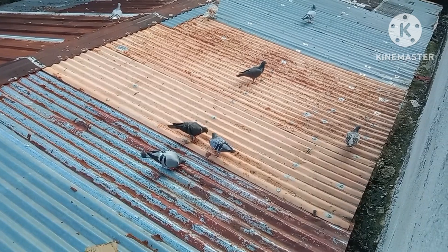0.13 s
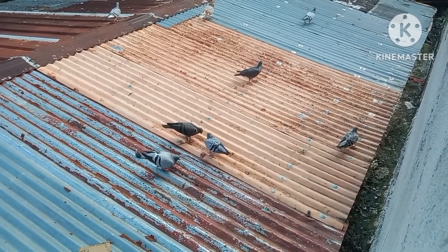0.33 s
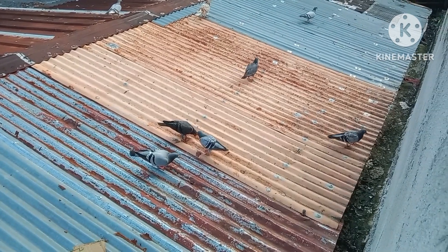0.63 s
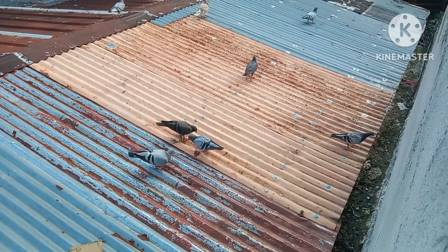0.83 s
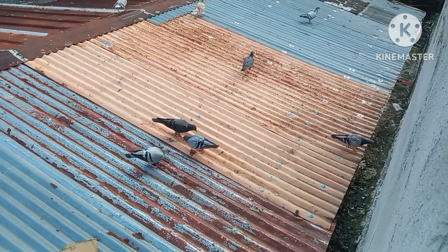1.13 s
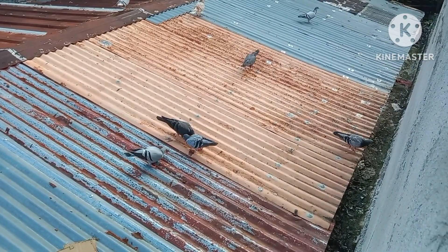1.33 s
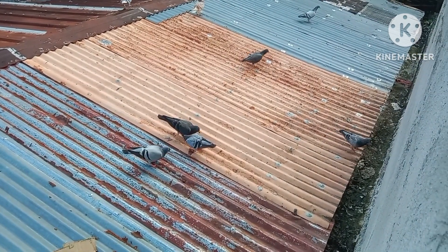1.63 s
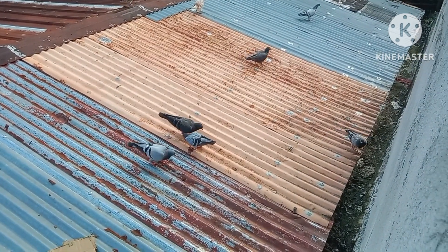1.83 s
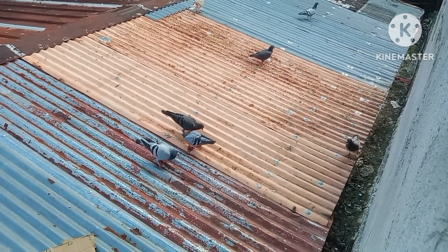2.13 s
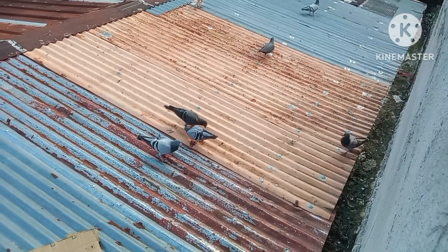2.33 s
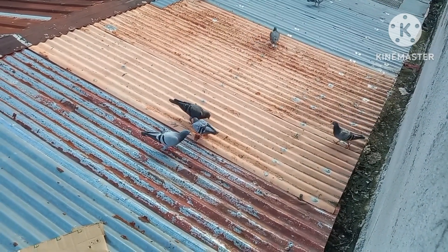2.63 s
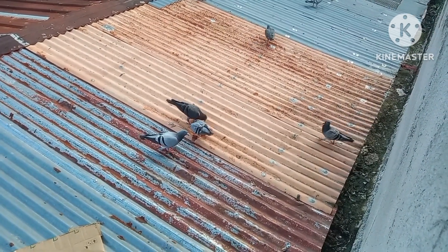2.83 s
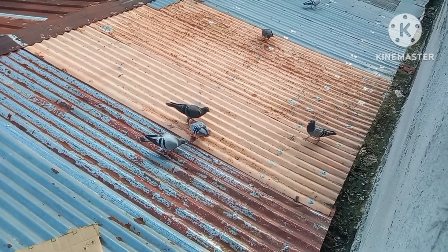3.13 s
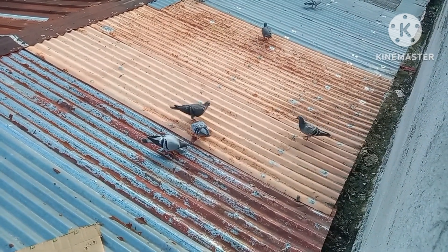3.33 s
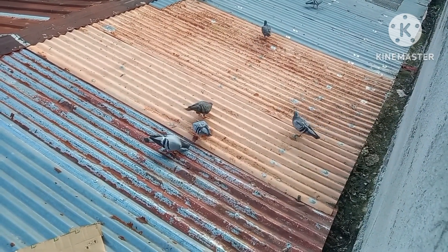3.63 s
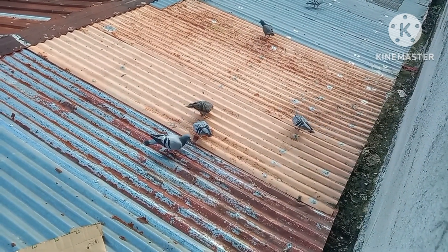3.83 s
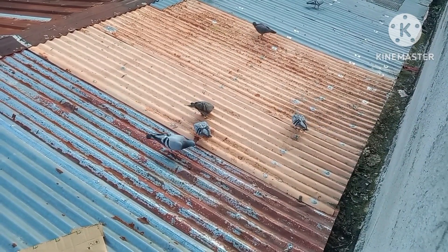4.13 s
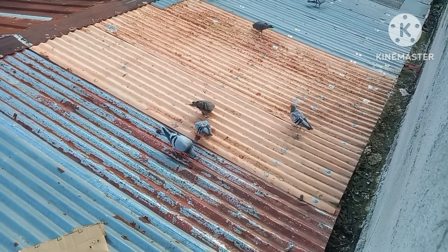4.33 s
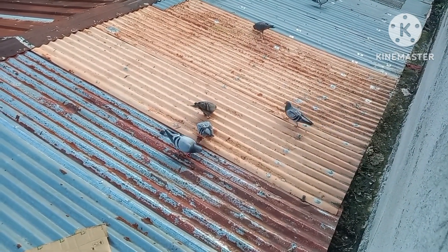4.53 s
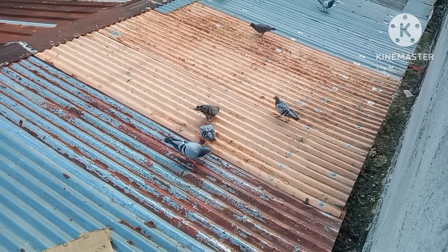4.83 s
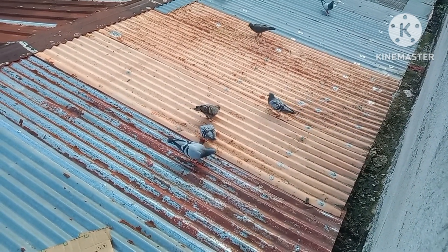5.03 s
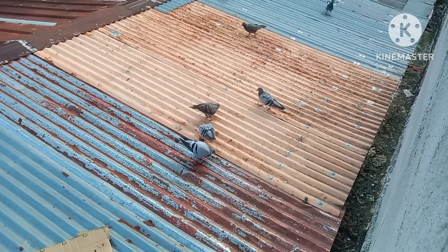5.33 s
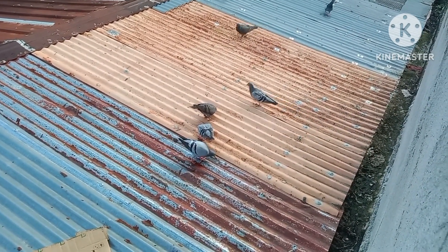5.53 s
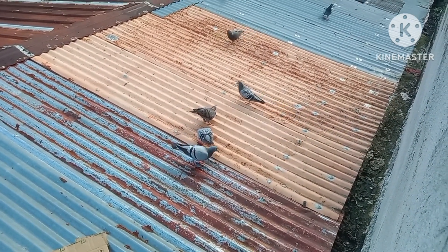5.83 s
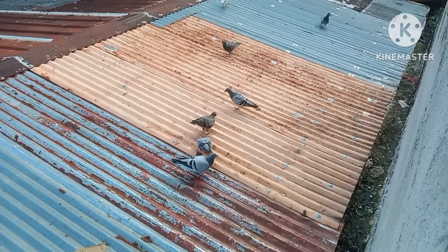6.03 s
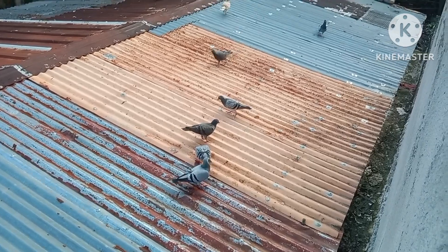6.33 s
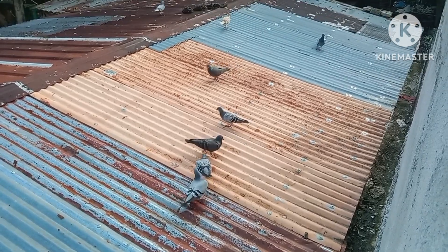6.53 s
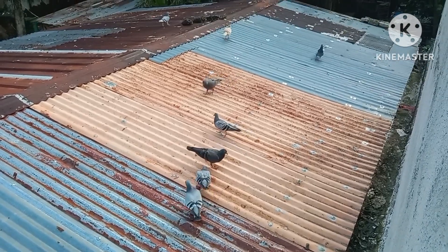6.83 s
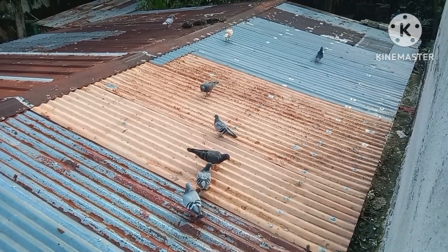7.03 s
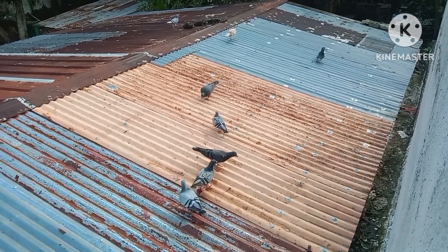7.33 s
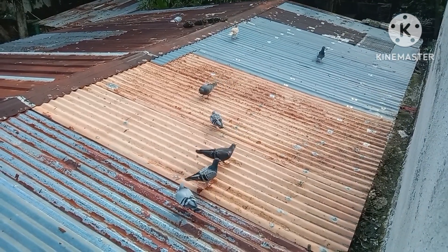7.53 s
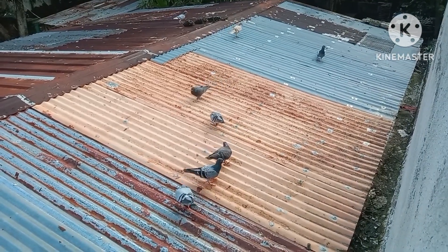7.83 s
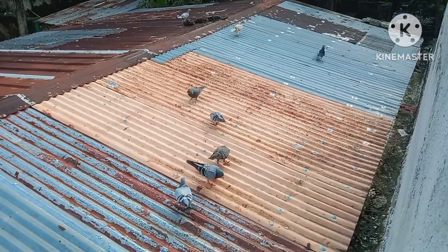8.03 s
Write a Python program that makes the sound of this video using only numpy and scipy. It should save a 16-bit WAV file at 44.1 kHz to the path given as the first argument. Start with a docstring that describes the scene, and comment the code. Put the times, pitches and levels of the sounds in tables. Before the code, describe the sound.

Pigeons on a loose corrugated iron roof outdoors, over faint low rumble and a shimmering high hiss. Thin, trilling, mostly falling squeaks from distant birds echo between walls throughout. At 0.3 s a loud, sharp, dry knock with a push of air lands right at the microphone. A faint coo follows at 1.1 s, another with a light roof touch at 1.9 s. Claws scratch at 2.1 and 2.3 s, with a small peck-like tick at 2.3 s and a rattling metal thump at 2.5 s; a weaker thump comes at 3.1 s. From 3.3 to 5.2 s there are soft, short, hoarse coos and light gritty scrapes. From 5.7 to 6.9 s harder blows clatter, clang and boom on the sheets. Wing claps build from 6.7 s, snapping about seven times a second, strongest around 7.4-7.5 s, with faint whistling swishes and feather rustle, weakening by 8 s.

```python
"""Pigeons on a corrugated iron roof, among thin squeaks that are whistled tones echoing between walls.
First a sharp knock, a pulse and a push of air, sounds right beside the microphone. Soft coos, arching sine tones,
follow; then feet and wings thump the loose sheets, claws scratch and a small tick falls, all from shaped noise
and ringing modes. Late on, harder blows lead into a take-off: noise-burst wing claps, each with a whistling stroke.
Short hollow sounds come now and then, and a faint rumble and a shimmering hiss lie under everything."""
import sys
import numpy as np
from scipy import signal
from scipy.fft import rfft, irfft, next_fast_len
from scipy.io import wavfile
from scipy.ndimage import uniform_filter1d, map_coordinates

SR = 44100
rng = np.random.default_rng(int(sys.argv[2]) if len(sys.argv) > 2 else 0)


def file_out(sig):
    """Save sig as 16-bit WAV at sys.argv[1]."""
    # one column per channel
    cols = np.atleast_2d(sig).T
    # limit, then scale
    lim = np.clip(cols, -1, 1)
    pcm = np.round(lim * 32767).astype(np.int16)
    wavfile.write(sys.argv[1], SR, pcm)


N = 360341
TIME = np.arange(N) / SR  # s

# Feet and wings striking the roof; clang and boom are mixed 1.5 dB lower:
# [t/s, rattle level/dB, clang level/dB, boom level/dB]
ROOF_BLOWS = [(1.9186, -48.5, -44.5, -49.5), (2.484, -32.5, -32, -29), (3.1107, -41, -46.5, -44),
              (3.137, -63, -48, -47.5), (5.709, -29, -31, -40.5), (5.845, -32, -30.5, -33),
              (5.939, -22, -24, -29.5), (5.9882, -35.5, -28, -31.5), (6.137, -48, -35.5, -36),
              (6.302, -44, -32, -44), (6.358, -22, -26, -31), (6.4024, -26.5, -27.5, -27.5),
              (6.553, -27, -29, -29), (6.672, -25.5, -29, -24.5), (6.7618, -31, -39.5, -38),
              (6.832, -34.5, -40.5, -41), (6.9149, -41, -45, -42)]
# Colour of the sheets' rattle: [f/Hz, relative level/dB per Hz]
RATTLE_SPECTRUM = [(1400, -65), (2650, -17.5), (3250, -2.5), (3980, -6.5), (5000, 2), (6150, -0.5),
                   (8000, -20.5), (10200, -30.5), (15800, -41)]
# Colour of the clang: [f/Hz, relative level/dB per Hz]
CLANG_SPECTRUM = [(250, -17), (400, -3.5), (480, -14.5), (690, 4.5), (790, -1.5), (1270, -6.5),
                  (2140, -13.5), (2570, -36), (3640, -9.5), (6160, -120)]
# Colour of the low boom: [f/Hz, relative level/dB per Hz]
BOOM_SPECTRUM = [(40, -34), (110, 0.5), (170, 7), (370, 0), (600, -8), (1300, -50)]
# Ringing modes of the roof sheets: [f/Hz, level against the blow/dB, t60/s]
SHEET_MODES = [(128.9, -17, 1), (209.1, -6.5, .38), (291.4, -12, 0.61), (682, -8, 0.43), (956, -13, 0.4)]
# Claps of the bird that flies off: [t/s, clap peak level/dB, after-slap level against the clap/dB]
WING_BEATS = [(6.72, -42.5, -9), (6.86, -28, -11), (7.008, -12.5, -1.5), (7.133, -19.5, -2.5),
              (7.2583, -12.5, -9), (7.3907, -8.5, -6.5), (7.5343, -7.5, -7.5), (7.688, -12, -6),
              (7.8527, -10, -6.5), (8.0388, -21.5, -3.5)]
# Colour of slapping feathers: [f/Hz, relative level/dB per Hz]
FEATHER_SPECTRUM = [(1400, -84), (2600, -27), (3500, -10.5), (5360, -3.5), (6350, -5.5), (8400, -24),
                    (15800, -33)]
# Colour of air moved by the wing: [f/Hz, relative level/dB per Hz]
SWISH_SPECTRUM = [(30, -17), (130, -1), (300, -16.5), (700, 4), (1650, 3), (2200, -15), (4000, -58)]
# Tones of the flight feathers at lift-off: [f/Hz, relative level/dB]
FLIGHT_TONES = [(1790, -1), (1300, -17), (916, -4.5)]
# Short hollow sounds around one pitch: a soft tap, a ring of the struck roof, wing swishes:
# [t/s, length/s, centre f/Hz, level/dB]
HOLLOW_SOUNDS = [(1.006, 0.059, 1200, -55.5), (2.129, 0.28, 1270, -48), (6.13, 0.049, 555, -32.5),
                 (7.324, 0.075, 801, -41), (7.745, 0.11, 1350, -50.5)]
# Ruffled plumage: [t/s, length/s, level/dB]
PLUMAGE_RUFFLES = [(1.503, 0.24, -60)]
# Claw scratches on the iron, and a small rustle in flight at 7.33 s: [t/s, level/dB, length as t60/s]
SCRATCHES_AND_RUSTLE = [(2.092, -37, 0.18), (2.322, -37, 0.17), (2.917, -61, 0.052), (3.726, -43.5, 0.13),
                        (3.955, -48.5, 0.15), (4.223, -44.5, 0.14), (4.694, -48.5, 0.22),
                        (5.2744, -53.5, 0.086), (6.136, -29, 0.15), (6.624, -37, 0.086), (7.33, -39, 0.15)]
# Colour of the grit in them: [f/Hz, relative level/dB per Hz]
GRIT_SPECTRUM = [(2400, -35), (3500, -14.5), (4400, -7.5), (5700, -2), (9000, -28.5), (12000, -32.5)]
# Colour of fine, fizzing ticks: [f/Hz, relative level/dB per Hz]
FIZZ_SPECTRUM = [(6000, -30), (8500, 1.5), (12000, -3.5), (15800, -14.5)]
# Coos: [t/s, length/s, top f/Hz, level/dB]
COO_NOTES = [(1.057, 0.18, 492, -52), (1.921, 0.11, 336, -40), (3.295, 0.018, 356, -42.5),
             (3.397, 0.04, 301, -50), (3.624, 0.23, 319.5, -44), (4.462, 0.055, 306, -48.5),
             (4.584, 0.018, 351, -39), (4.671, 0.022, 314, -37.5), (4.902, 0.1, 321, -45),
             (4.988, 0.205, 337.6, -44), (7.111, 0.018, 321, -39)]
# Squeaks of distant birds, before the direct and echoed mix: [t/s, start f/Hz, end f/Hz, level/dB]
SQUEAK_NOTES = [(0.251, 5790, 5244, -43.5), (0.43, 5680, 4750, -45), (0.463, 4850, 3750, -53),
                (0.745, 5900, 5100, -46), (0.769, 4200, 3750, -51.5), (1.009, 5260, 4850, -51),
                (1.23, 6310, 6050, -51), (1.309, 6240, 5850, -41.5), (1.56, 6170, 5300, -46.5),
                (1.593, 5010, 3700, -48), (1.889, 5420, 4950, -50), (2.2, 5970, 5240, -50),
                (2.642, 5630, 4950, -53.5), (3.02, 5070, 3700, -48), (3.045, 5605, 4976, -39.5),
                (3.543, 5174, 4750, -47.5), (4.04, 5300, 4650, -48), (4.119, 4490, 3650, -55),
                (4.4, 5480, 5250, -46.5), (4.432, 4570, 3650, -51), (4.772, 4930, 3600, -49),
                (4.901, 4790, 5050, -51.5), (5.056, 5500, 5200, -53), (5.098, 4046, 3750, -52.5),
                (6.22, 5060, 4600, -45.5), (7.86, 5120, 4350, -44.5), (8.024, 4980, 3900, -44)]
# Short level peeps farther off, before the same mix: [t/s, f/Hz, level/dB]
PEEP_NOTES = [(3.171, 2325, -59), (3.87, 3690, -58), (4.19, 2144, -65), (4.9, 3440, -59), (6.17, 3720, -47)]
# Ring of the peck-like tick: [f/Hz, level against the ring setting/dB, t60/s]
PECK_MODES = [(1285, 12.5, 0.021), (2010, -10, 0.11)]
# Drift of the background: [t/s, rumble level/dB, hiss level/dB]
AMBIENCE_LEVELS = [(0, -64.5, -62), (2.4, -59, -56.5), (3.6, -61, -60), (4.5, -60, -62.5), (5.5, -64, -63),
                   (8.17, -61.5, -53.5)]
# Colour of the outdoor rumble: [f/Hz, relative level/dB per Hz]
RUMBLE_SPECTRUM = [(25, -21.5), (100, 1.5), (200, -3.5), (450, -12.5), (1300, -13), (2300, -27),
                   (4000, -50.5)]
# Colour of the hiss and of the rustle in flight: [f/Hz, relative level/dB per Hz]
HISS_SPECTRUM = [(2400, -37), (3100, -21.5), (3700, -7), (4300, -16.5), (5100, -1.5), (6500, -6.5),
                 (7200, -17), (8000, -17), (10500, -25.5), (12000, -37.5), (15800, -46)]
# Decay of the echo between the walls: [f/Hz, t60/s]
YARD_DECAY = [(150, 0.61), (1500, 0.2), (5000, 0.46), (12000, 0.2)]

CRACKLE_DB = -24  # fine ticks of claws and quills, against the rattle
FIZZ_DB = -18  # fizz against the scrape
BODY_DB, BODY_GROWS = -9.5, 1.91  # body of a full-scale clap; hard claps gain body faster than snap (dB per dB)
WHISTLE_LAG_S, WHISTLE_S = 0.014, 0.11  # delay and length of the stroke after each clap
WHISTLE_DB, STROKE_SWISH_DB = -45, -47.5  # levels at lift-off
RECEDE_DB_PER_S, WHISTLE_SAG_PER_S = 24, .09  # fall in level, and fall in pitch as a share of the first
TAKEOFF_S, RUSTLE_RISE_S, RUSTLE_DB = 6, 0.7, -50  # feathers rustle from the take-off on
ARCH_PER_HZ = 0.00033  # higher coos bend their pitch further
SQUEAK_S = .125  # every squeak lasts alike
KNOCK_S, TICK_S = .2893, 2.309  # moments of the knock and of the tick
BOUNCE_S, BOUNCE_DB = 0.0026, -7  # far sounds arrive again off the roof
TOP_HZ = 15900  # band limit of the microphone


def roof():
    """Bending waves spread through the sheets: rattle arrives first, then clang and low boom, and modes ring on."""
    out, t = np.zeros(N), np.arange(SR) / SR
    for s, rattle_db, clang_db, boom_db in ROOF_BLOWS:
        buzz = noise(RATTLE_SPECTRUM, len(t), grain_db=2, patchy_db=3.5)
        crackle = noise(FIZZ_SPECTRUM, len(t), grain_db=6) * swell(t, rise=0.0056, t60=0.166)
        rattle = swell(t, rise=0.0089, t60=0.29) * buzz + amp(CRACKLE_DB) * crackle
        clang = swell(t, rise=0.019, t60=0.38) * noise(CLANG_SPECTRUM, len(t), grain_db=2, patchy_db=4)
        boom = swell(t, rise=0.024, t60=0.37) * noise(BOOM_SPECTRUM, len(t), patchy_db=3.5)
        clang_and_boom = amp(-1.5) * (amp(clang_db) * clang + amp(boom_db) * boom)
        ring = sheet_ring(t, clang_db, boom_db)
        add(out, s, amp(rattle_db) * rattle + clang_and_boom + ring)
    return out


def sheet_ring(t, clang_db, boom_db):
    """The loose sheets ring in wavering modes that shift from blow to blow; the low ones follow the boom."""
    out = np.zeros(len(t))
    for hz, db, t60 in SHEET_MODES:
        shifted_hz = hz * rng.normal(1, .025)
        tone = whistle(np.full(len(t), shifted_hz), waver=.035)
        force_db = boom_db if hz < 500 else clang_db
        out += amp(force_db + db) * swell(t, rise=.02, t60=t60) * tone
    return out


def wing_claps():
    """The wing tips slap together, then other feathers meet in two weaker slaps; each beat has its own pitch."""
    out, t = np.zeros(N), np.arange(SR // 6) / SR
    quill_pitches = rng.uniform(4700, 5800, len(WING_BEATS))  # Hz
    for (s, db, after_db), hz in zip(WING_BEATS, quill_pitches):
        for delay, slap_db in [(0, 0), (0.007, after_db), (0.0155, 2 * after_db)]:
            quills = noise([(hz / 2, -50), (hz, 0), (2 * hz, -60)], len(t))
            vanes = noise(FEATHER_SPECTRUM, len(t), grain_db=5, patchy_db=5.5)
            snap = swell(t, rise=0.0004, t60=0.029) * (vanes + amp(-5) * quills)
            body = swell(t, rise=0.0017, t60=0.11) * noise(SWISH_SPECTRUM, len(t), patchy_db=6.5)
            body_db = BODY_DB + BODY_GROWS * db + slap_db
            add(out, s + delay, amp(db + slap_db) * snap / np.abs(snap).max())
            add(out, s + delay, amp(body_db) * body / np.abs(body).max())
    return out


def flight():
    """After each clap the flight feathers whistle and swish, lower and fainter as the bird leaves."""
    out, arch = np.zeros(N), half_sine(WHISTLE_S)
    for s, *_ in WING_BEATS:
        flown_s = s - WING_BEATS[0][0]
        pitch = np.full(len(arch), 1 - WHISTLE_SAG_PER_S * flown_s)
        tone = sum(amp(db) * whistle(hz * pitch, waver=.009) for hz, db in FLIGHT_TONES)
        air = amp(WHISTLE_DB) * tone + amp(STROKE_SWISH_DB) * noise(SWISH_SPECTRUM, len(arch))
        add(out, s + WHISTLE_LAG_S, amp(-RECEDE_DB_PER_S * flown_s) * arch * air)
    airborne = np.clip((TIME - TAKEOFF_S) / RUSTLE_RISE_S, 0, 1)
    rustle = amp(RUSTLE_DB + 0.34 * wobble(8.0, N)) * noise(HISS_SPECTRUM, N)
    return out + airborne * rustle


def hollow_sounds():
    """A soft tap, a ring of the struck roof and wing swishes: noise and a wavering tone around one pitch."""
    out = np.zeros(N)
    for s, length, hz, db in HOLLOW_SOUNDS:
        arch = half_sine(length)
        hollow = [(hz / 4, -24), (.75 * hz, -7), (hz, 0), (1.3 * hz, -10), (2.5 * hz, -20), (4 * hz, -50)]
        tone = whistle(np.full(len(arch), hz), waver=.04)
        add(out, s, amp(db) * arch * (noise(hollow, len(arch), patchy_db=6) + .5 * tone))
    return out


def ruffles():
    """Ruffled plumage gives a soft, high rustle."""
    out = np.zeros(N)
    for s, length, db in PLUMAGE_RUFFLES:
        arch = np.hanning(round(length * SR))
        add(out, s, amp(db) * arch * noise(FIZZ_SPECTRUM, len(arch), grain_db=0.5))
    return out


def scratches_and_rustle():
    """Claws slip over the rusty ridges in short gritty strokes, the shorter the sharper; a small rustle is alike."""
    out, t = np.zeros(N), np.arange(SR // 4) / SR
    for s, db, length in SCRATCHES_AND_RUSTLE:
        grit = noise(GRIT_SPECTRUM, len(t), grain_db=2)
        fizz = noise(FIZZ_SPECTRUM, len(t), grain_db=3.5)
        stroke = swell(t, rise=.08 * length, t60=length)
        add(out, s, amp(db) * (grit + amp(FIZZ_DB) * fizz) * stroke)
    return out


def coos():
    """Soft, slightly hoarse throat tones whose pitch arches."""
    out = np.zeros(N)
    for s, length, top_hz, db in COO_NOTES:
        arch = half_sine(length)
        bend = ARCH_PER_HZ * top_hz * (1 - arch)
        hz = top_hz * (1 - bend + .033 * wobble(130, len(arch)))
        quaver = unit(amp(2.2 * wobble(90, len(arch))))
        tone = np.sin(2 * np.pi * np.cumsum(hz) / SR)
        add(out, s, amp(db) * quaver * np.sqrt(arch) * tone)
    return out


def squeaks(count=70, low_hz=4800, high_hz=6700, fall=0.093, faint_db=-56.0, spread_db=6):
    """Overlapping squeaks over many fainter, flatter ones scattered at random."""
    out = np.zeros(N)
    for s, start_hz, end_hz, db in SQUEAK_NOTES:
        add(out, s, amp(db) * squeak(start_hz, end_hz))
    for k, (when, high, weak) in enumerate(rng.random((count, 3))):
        s = (k + when) / count * N / SR
        hz = low_hz + (high_hz - low_hz) * high
        add(out, s, amp(faint_db - spread_db * weak) * squeak(hz, hz * (1 - fall)))
    return out


def squeak(start_hz, end_hz):
    """One chirp that moves quickly in pitch and levels out; it sounds on the crests of an uneven trill."""
    u = np.linspace(0, 1, round(SQUEAK_S * SR))
    trill_hz = rng.uniform(35, 70)
    trill = np.sin(2 * np.pi * trill_hz * SQUEAK_S * u + 2 * wobble(40, len(u)))
    glide = end_hz + (start_hz - end_hz) * (1 - u) ** 1.7
    hz = glide * (1 + .035 * trill)
    voice = whistle(hz, waver=.008) + .5 * whistle(hz, waver=.055)  # a clear and a rough tone
    return np.sin(np.pi * u ** .7) * unit(amp(7 * trill)) * voice


def peeps():
    """Short, level whistles of a distant bird, lower than the squeaks."""
    out, arch = np.zeros(N), np.hanning(round(.13 * SR))
    for s, hz, db in PEEP_NOTES:
        add(out, s, amp(db) * arch * whistle(np.full(len(arch), hz), waver=0.0212))
    return out


def knock(click_db=0, push_db=9, echo_db=-21):
    """A close knock: a sharp click and a brief push of air, which a wall throws back."""
    out, t = np.zeros(N), np.arange(SR // 4) / SR
    click = -np.exp(-((t - .0003) / .00017) ** 2)
    u = t / .00085
    push = amp(push_db) * (1 - np.exp(-(2 * u) ** 2)) * (1 - u) * np.exp(-u)
    snap = amp(-35.5) * swell(t, rise=0.000068, t60=0.013) * noise(FIZZ_SPECTRUM, len(t))
    dull = noise([(200, 0.5), (1400, -6.5), (3000, -18.0), (7000, -33.0)], len(t), patchy_db=-3.0)
    scatter = amp(-30.5) * swell(t, rise=0.0009, t60=0.2) * dull
    add(out, KNOCK_S, amp(click_db) * click + snap + scatter)
    add(out, KNOCK_S + .00085, push)
    add(out, KNOCK_S + .0238, amp(echo_db) * push)
    # a small source radiates no deep bass; the whole knock is then lifted 2 dB
    return amp(2) * signal.sosfilt(signal.cheby1(2, 2, 140, "high", fs=SR, output="sos"), out)


def tick(low_hz=800, high_hz=2100, click_db=4, ring_db=-36):
    """A small dry tick, like a peck: a band-passed pulse with a brief ring and no sharp edge."""
    pulse, t = np.zeros(N), np.arange(SR // 10) / SR
    pulse[round(TICK_S * SR)] = amp(click_db)
    out = signal.sosfilt(signal.butter(6, [low_hz, high_hz], "band", fs=SR, output="sos"), pulse)
    for hz, db, t60 in PECK_MODES:
        add(out, TICK_S, amp(ring_db + db - 60 * t / t60) * np.sin(2 * np.pi * hz * t))
    return signal.sosfilt(signal.butter(10, 3100, fs=SR, output="sos"), out)


def background():
    """Faint outdoor rumble and a high, shimmering hiss: coloured noise whose levels waver."""
    rumble_db, hiss_db = curves(AMBIENCE_LEVELS)
    rumble = amp(rumble_db + 2 * wobble(10, N)) * noise(RUMBLE_SPECTRUM, N, patchy_db=4)
    hiss = amp(hiss_db + 1.5 * wobble(8, N)) * noise(HISS_SPECTRUM, N, patchy_db=4)
    return rumble + bounced(hiss)


def yard(x):
    """Diffuse echo of the walls and roofs around: a noise tail that dies at its own pace in each band."""
    hz, t, z = signal.stft(rng.standard_normal(SR * 3 // 4), SR, nperseg=256)
    decay = amp(-60 * t / along(YARD_DECAY, hz)[:, None])
    tail = signal.istft(z * decay, SR, nperseg=256)[1]
    tail[:SR // 100] = 0  # no echo in the first 10 ms
    return signal.fftconvolve(x, tail / np.linalg.norm(tail))[:N]


def bounced(x):
    """A far sound plus its glancing reflection off the roof, which ribs its spectrum."""
    out = x.copy()
    add(out, BOUNCE_S, amp(BOUNCE_DB) * x)
    return out / np.hypot(1, amp(BOUNCE_DB))


def whistle(hz, waver):
    """A wavering tone of rms 1 that follows a pitch curve."""
    pitch = hz * (1 + waver * wobble(350, len(hz)))
    tone = np.sin(2 * np.pi * np.cumsum(pitch) / SR)
    return unit(tone * amp(1.5 * wobble(200, len(hz))))


def noise(spectrum, size, grain_db=0, patchy_db=3):
    """Coloured noise of rms 1; grain makes it crackle, patches let single pitches stand out for a moment."""
    white = rng.standard_normal(size) * amp(grain_db * wobble(600, size))
    z = signal.stft(white, nperseg=512)[2]
    patches = uniform_filter1d(rng.standard_normal(z.shape), size=2, axis=0)  # across pitch
    patches = unit(uniform_filter1d(patches, size=12, axis=1))  # across time
    patchy = signal.istft(z * amp(patchy_db * patches), nperseg=512)[1]
    m = next_fast_len(size)
    colour = amp(along(spectrum, np.fft.rfftfreq(m, 1 / SR)))
    return unit(irfft(rfft(patchy, m) * colour, m)[:size])


def swell(t, rise, t60):
    """An envelope of peak 1 that builds up and dies away."""
    shape = (1 - np.exp(-(t / rise) ** 2)) * amp(-60 * t / t60)
    return shape / shape.max()


def half_sine(length):
    """An arch of the given length in seconds, from 0 up to 1 and back."""
    return np.sin(np.linspace(0, np.pi, round(length * SR)))


def wobble(rate, size):
    """A smooth random curve with rate knots a second."""
    knots = rng.standard_normal(int(size * rate / SR) + 4)
    return map_coordinates(knots, [np.arange(size) * rate / SR])


def curves(rows):
    """One value per sample for each column after the time."""
    s, *cols = np.transpose(rows)
    return [np.interp(TIME, s, c) for c in cols]


def along(points, hz):
    """Read (Hz, value) points on a log frequency axis."""
    f, v = np.transpose(points)
    return np.interp(np.log(hz + 1), np.log(f + 1), v)


def amp(db):
    """Decibels to gain."""
    return 10 ** (np.asarray(db) / 20)


def unit(x):
    """Scale to rms 1."""
    return x / np.sqrt(np.mean(x ** 2) + 1e-20)


def add(track, s, sound):
    """Mix a sound into the track at time s."""
    part = track[max(round(s * SR), 0):][:len(sound)]
    part += sound[:len(part)]


def scene():
    """The birds on the roof are heard mostly directly, the squeaks and peeps mostly by their echo."""
    birds = roof() + wing_claps() + flight() + hollow_sounds() + ruffles() + scratches_and_rustle() + coos()
    calls = squeaks() + peeps()
    near = birds + amp(-12.5) * yard(birds)
    far_calls = bounced(amp(-6) * calls + yard(calls))
    return (near + far_calls + knock() + tick() + background())[None]


def record(dry, low_cut_hz=60):
    """The microphone thins the deep bass and keeps nothing above its band limit."""
    thinned = signal.sosfilt(signal.butter(2, low_cut_hz, "high", fs=SR, output="sos"), dry)
    m = next_fast_len(N + SR // 2)
    in_band = np.fft.rfftfreq(m, 1 / SR) < TOP_HZ
    return irfft(rfft(thinned, m) * in_band, m)[:, :N]


dry = scene()
out = record(dry)
file_out(out)
```